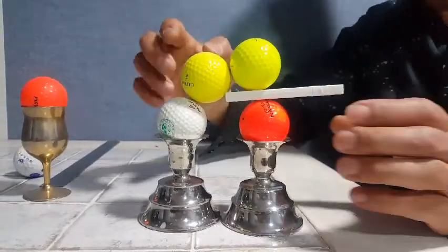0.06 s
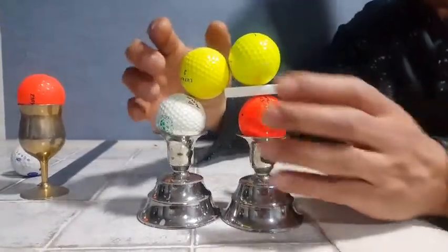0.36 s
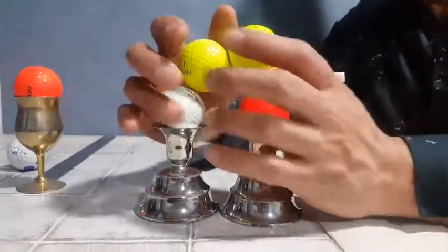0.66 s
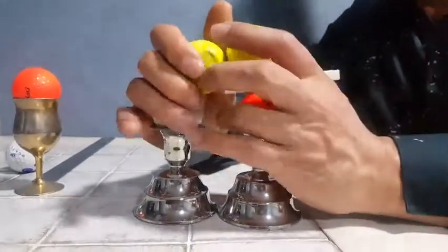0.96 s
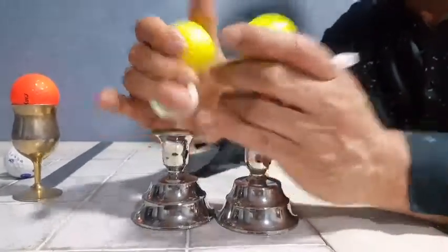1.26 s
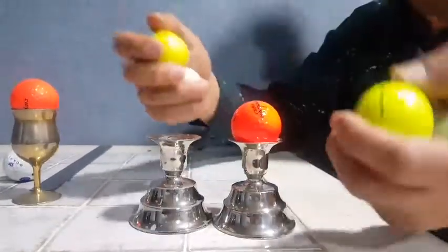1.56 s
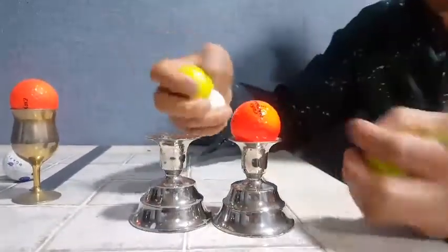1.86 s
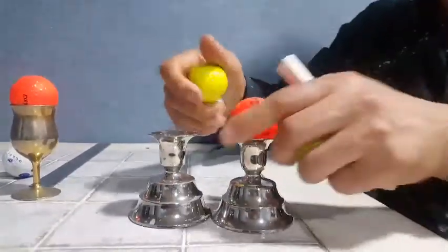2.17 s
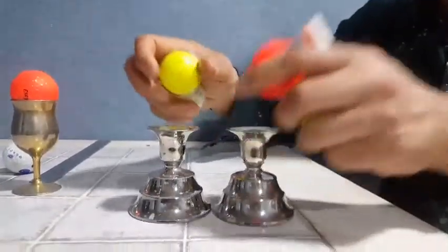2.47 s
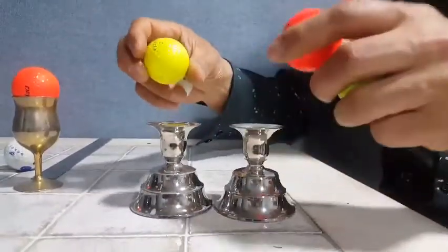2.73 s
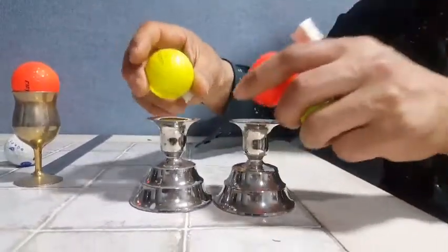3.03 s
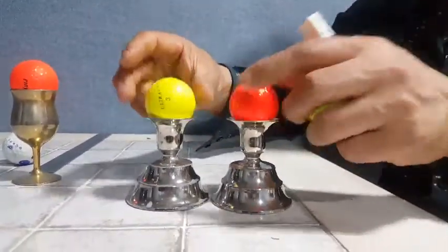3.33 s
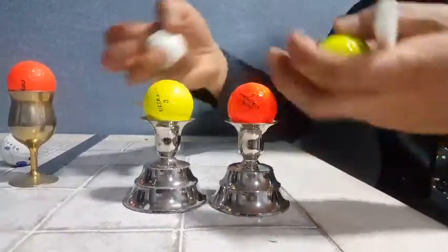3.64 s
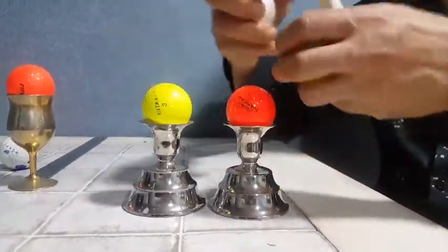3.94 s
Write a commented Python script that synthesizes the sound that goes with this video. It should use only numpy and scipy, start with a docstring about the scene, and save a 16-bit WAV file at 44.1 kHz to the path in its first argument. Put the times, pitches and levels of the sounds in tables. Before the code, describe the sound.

Two short, loud bursts of metal candle holders rocking and ringing on tiles, as golf balls are lifted off and put down. Faint taps and rubs come first and small ball clicks last, heard up close in a quiet room.

```python
"""A tiled table in a quiet room, close up: golf balls are handled over two metal candle holders.
One ball is lifted off and two are set down: each time a holder rocks, knocks and chatters on the tiles,
and its cup rings, higher while the ball presses on it. The steel sings briefly as a ball rubs the rim.
In between, balls click together, fingers tap and rub faintly, and sleeves brush."""
import sys
import numpy as np
from scipy import signal
from scipy.fft import rfft, irfft
from scipy.io import wavfile

SR = 44100
rng = np.random.default_rng(int(sys.argv[2]) if len(sys.argv) > 2 else 0)


def to_wav(sig):
    """Store sig (one row per channel, or 1-D mono) as 16-bit WAV at the path in sys.argv[1].

    Samples outside -1..1 are clipped; the rate is SR.
    """
    pcm = np.clip(np.atleast_2d(sig), -1, 1) * 32767
    pcm = np.round(pcm).astype(np.int16)
    wavfile.write(sys.argv[1], SR, pcm.T)  # frames by channels


N = 176400
T = np.arange(N) / SR
TAIL = SR // 2  # samples in a decay

# tone colour of a click on a golf ball: f/Hz, level/dB
CLICK_COLOUR = [(100, -13.5), (400, -12), (850, 6), (1700, 3.5), (2600, -2), (4200, -16.5), (6000, -23),
                (9000, -16.5), (15000, -26)]


def undb(db):
    """Decibels to gain."""
    return 10 ** (np.asarray(db) / 20)


def unit(x):
    """Scale to rms 1."""
    return x / np.sqrt(np.mean(x ** 2))


def pan(db):
    """Stereo gains with the left louder by db."""
    gains = undb(np.array([[db], [-db]]) / 2)
    return gains / gains.mean()


def filtered(x, kind, hz, order):
    """Butterworth low, high or band pass."""
    return signal.sosfilt(signal.butter(order, hz, kind, fs=SR, output="sos"), x)


def fade(t60):
    """Exponential decay of unit energy."""
    decay = np.exp(-np.log(1000) * T[:TAIL] / t60)
    return decay / np.linalg.norm(decay)


def swell(middle, length):
    """Bell-shaped envelope, timed in seconds."""
    return np.exp(-(2 * (T - middle) / length) ** 2)


def through(x, response):
    """Convolve with a response, channel by channel."""
    return signal.fftconvolve(np.atleast_2d(x), np.atleast_2d(response), axes=1)[:, :N]


def colour(points, size=4096):
    """Minimum-phase response of unit energy with the given spectrum."""
    hz, db = np.array(points).T
    bins = np.maximum(np.fft.rfftfreq(size, 1 / SR), 1)
    cepstrum = irfft(np.log(undb(np.interp(np.log(bins), np.log(hz), db))))
    cepstrum[1:size // 2] *= 2
    cepstrum[size // 2 + 1:] = 0
    response = irfft(np.exp(rfft(cepstrum)))
    return response / np.linalg.norm(response)


def stereo_noise(width, size):
    """Noise that spreads with width while its bass stays centred."""
    mid, side = rng.standard_normal((2, size))
    side = filtered(side, "high", 280, order=1)
    return np.array([mid + width * side, mid - width * side]) / np.hypot(1, width)


def scatter(t60, share, width):
    """A direct click followed by a dense fading tail without bass."""
    response = filtered(share * fade(t60) * stereo_noise(width, TAIL), "high", 300, order=2)
    response[:, 0] += 1
    return response / np.hypot(1, share)


def blows(times, db):
    """One impulse for each contact."""
    x = np.zeros(N)
    np.add.at(x, np.clip((np.asarray(times) * SR).astype(int), 0, N - 1), undb(db))
    return x


def ping(start, db, hz, t60):
    """One damped vibration."""
    age = np.maximum(T - start, 0)
    return undb(db) * np.exp(-np.log(1000) * age / t60) * np.sin(2 * np.pi * hz * age)


def room_tone():
    """A low steady bed of room noise with a faint wide hiss."""
    spectrum = [(12, -38.5), (20, -5.5), (22, -7.5), (34, -9.5), (53, -8.5), (207, -7), (245, -1),
                (282, -14.5), (306, -16), (333, -15.5), (404, -14.5), (565, -23), (985, -29.5), (1340, -29),
                (2030, -25.5), (3850, -34.5), (4950, -41), (7110, -42), (15500, -46)]  # colour of the bed: f/Hz, level/dB
    mid, side = rng.standard_normal((2, N))
    side = side - 0.45 * filtered(side, "low", 1500, order=1)  # narrower in the lows
    bed = through(np.array([mid + side, mid - side]), colour(spectrum))
    return unit(bed) * undb(-59) * pan(2.5)


def room_reverb(x):
    """A small room that holds on to the low notes."""
    tail = fade(t60=0.17) * stereo_noise(width=0.47, size=TAIL)
    tail = filtered(tail, "low", 200, order=1)
    tail = filtered(tail, "low", 1200, order=1)
    return undb(-5.5) * through(x.mean(axis=0), tail)


def brushes():
    """Soft swells of cloth and skin as the hands move."""
    strokes = [(1.15, 0.17, -67.5), (1.45, 0.31, -68.5), (1.8, 0.21, -67.5), (1.99, 0.078, -59),
               (3.52, 0.14, -68.5), (3.79, 0.056, -66.5)]  # hand movements: middle t/s, length/s, level/dB
    cloth = [(200, -9), (700, -1), (1500, -1.5), (2800, 3), (5000, -13.5), (8700, -9.5), (10500, -21),
             (15000, -16.5)]  # colour of sleeves and skin: f/Hz, level/dB
    envelope = sum(undb(db) * swell(t, length) for t, length, db in strokes)
    return through(envelope * stereo_noise(width=0.99, size=N), colour(cloth)) * pan(3)


def rubs():
    """A finger or ball rubs drily: short grainy swells, each in one broad resonance."""
    strokes = [(1.136, 0.028, -56.5, 2640, 1230), (1.044, 0.1, -63, 820, 470),
               (1.235, 0.04, -64, 2300, 440), (2.436, 0.026, -47.5, 1800, 600),
               (3.795, 0.027, -61, 2900, 670)]  # rubs: middle t/s, length/s, level/dB, centre f/Hz, bandwidth/Hz
    out = 0
    for t, length, db, hz, width in strokes:
        grain = rng.standard_normal(N) * np.exp(.5 * rng.standard_normal(N))
        band = filtered(grain, "band", [max(hz - width / 2, 50), hz + width / 2], order=2)
        out = out + undb(db) * unit(band) * swell(t, length)
    return out * pan(6)


def finger_taps():
    """A finger on a ball gives a dull tap that dies away in a rough little scuff."""
    # taps: t/s, tone level/dB, f/Hz, scuff t60/s, click level/dB, left minus right/dB
    taps = [(.959, -46, 410, .06, -66, 4), (1.012, -44.5, 644, 0.085, -55, 4),
            (1.039, -39.5, 800, 0.035, -63, 8), (1.0561, -40, 660, 0.11, -50, 5),
            (1.182, -43, 730, 0.14, -67, 7), (1.216, -39.5, 430, 0.043, -52.5, 6),
            (1.239, -43, 505, 0.071, -49, 5), (1.535, -36.5, 900, 0.1, -35, 2),
            (1.923, -40.5, 734, 0.034, -46, 2), (1.971, -48, 694, 0.016, -52, 4),
            (2.022, -46.5, 780, 0.024, -44, 3), (2.0793, -44, 1260, 0.015, -48.5, 5),
            (2.1337, -48.5, 950, 0.022, -48, 5), (2.323, -37.5, 440, 0.15, -58, 2.5),
            (2.352, -42, 480, 0.077, -58, 4), (2.877, -48, 680, 0.0091, -51.5, 27),
            (3.002, -44.5, 856, .012, -55, 27), (3.146, -48, 1898, 0.035, -59.5, 7),
            (3.541, -61, 813, 0.019, -38, -9), (3.8405, -47.5, 760, 0.011, -48, -5)]
    out, click = np.zeros((2, N + SR)), colour(CLICK_COLOUR)
    ring_cycles = 5.2
    for t, db, hz, t60, click_db, pan_db in taps:
        tone = ping(0, db + 5.5, hz, t60=ring_cycles / hz)[:len(click)]
        hit = tone + undb(click_db + 12.5) * click
        tap = pan(pan_db) * through(hit, scatter(t60, share=0.82, width=0.56))
        start = int(t * SR)
        out[:, start:start + tap.shape[1]] += tap
    return out[:, :N]


def ball_clicks():
    """Ball on ball: a snap and a few very short modes, smeared a little by the table."""
    clicks = [(1.5338, -40.5, 8), (1.537, -37, 9), (2.0787, -42.5, 4), (3.541, -29.5, 2.5),
              (3.796, -50, 8.5), (3.8413, -33, 2)]  # collisions: t/s, level/dB, left minus right/dB
    modes = [(830, -14.5, 0.019), (1370, -12, 0.0084), (2520, 4, 0.019), (2727, -2.5, 0.0091),
             (3350, -7, 0.0076), (4360, -18.5, 0.034)]  # modes of the click: f/Hz, level/dB, t60/s
    snap = undb(-7.5) * colour(CLICK_COLOUR)
    hit = snap + sum(ping(0, db, hz, t60) for hz, db, t60 in modes)[:len(snap)]
    impacts = sum(pan(pan_db) * blows([t], [db]) for t, db, pan_db in clicks)
    return undb(-3) * through(through(impacts, hit), scatter(t60=0.014, share=1.0, width=1.0))


def rim_squeaks():
    """The steel sings on one slightly unsteady mode as a ball rubs along the rim."""
    squeaks = [(2.524, 0.039, 1321, -24), (2.59, 0.077, 2200, -41.5), (3.383, 0.069, 2900, -43),
               (3.352, 0.033, 2300, -27)]  # sung notes: middle t/s, length/s, f/Hz, level/dB
    drift = np.cumsum(rng.standard_normal(N)) * 0.0071
    return sum(undb(db) * np.sqrt(2) * swell(t, length) * np.sin(2 * np.pi * hz * T + drift)
               for t, length, hz, db in squeaks)


def chatter(median_gap_s=0.001, spread_db=2.5):
    """Tiny uneven contacts in quick succession, rms 1."""
    gap, size = rng.standard_normal((8000, 2)).T
    times = np.cumsum(np.exp(gap / 2)) * median_gap_s
    inside = times < T[-1]
    return unit(blows(times[inside], spread_db * size[inside]))


def chatter_envelopes():
    """Gains of rattle, cup ring and treble over the three bouts of rocking."""
    # bouts of chatter: t/s, tile rattle level/dB, cup ring level/dB, treble level/dB
    lift = [(2.456, -68.5, -65, -69), (2.459, -30.5, -25.5, -46), (2.467, -30.5, -37, -32.5),
            (2.4695, -24.5, -12.5, -33), (2.488, -29, -22, -44.5), (2.534, -28.5, -22, -44),
            (2.543, -36.5, -35, -59), (2.562, -33, -32, -63.5), (2.566, -23, -28.5, -30.5),
            (2.581, -26, -19, -37.5), (2.598, -26, -36.5, -55), (2.606, -22.5, -23, -32),
            (2.629, -28, -28, -34), (2.638, -22, -18.5, -34.5), (2.649, -35.5, -54, -49.5),
            (2.662, -60, -52, -56)]
    touch = [(3.144, -56.5, -69, -69), (3.17, -46.5, -62, -71.5), (3.171, -31, -36.5, -51.5),
             (3.188, -26.5, -41, -64), (3.204, -47, -56.5, -72), (3.225, -66.5, -74, -77.5)]
    set_down = [(3.267, -56, -64, -58.5), (3.272, -23.5, -20, -45), (3.290, -32.5, -26.5, -37),
                (3.297, -24.5, -16.5, -38), (3.31, -27, -18, -50.5), (3.317, -29.5, -52.5, -51),
                (3.335, -22.5, -28.5, -42.5), (3.355, -18, -16.5, -33.5), (3.367, -23, -19.5, -30),
                (3.392, -20, -23.5, -38), (3.412, -22, -26, -36.5), (3.424, -27.5, -19, -44),
                (3.434, -33, -28, -44), (3.447, -30, -26, -49.5), (3.455, -40, -51, -53),
                (3.476, -64, -83.5, -68)]
    gains = np.zeros((3, N))
    for bout in (lift, touch, set_down):
        times, *levels = np.array(bout).T
        active = (T > times[0]) * (T < times[-1])
        gains += undb([np.interp(T, times, db) for db in levels]) * active
    return gains


def tiles(push, knocks):
    """The tiled top answers with a dark clatter and a short pitched thud for each knock."""
    spectrum = [(30, -31), (55, -22), (90, -5), (140, 2), (220, -2), (370, 0), (550, -3.5), (850, 1.5),
                (1200, -1), (1650, -8), (2200, -2), (3000, -22), (6000, -30.5), (10000, -52), (15000, -69)]  # colour of the table top: f/Hz, level/dB
    clatter = through(through(push, colour(spectrum)), scatter(t60=0.021, share=0.91, width=1))
    thuds = sum(ping(t, db, hz, t60=0.014) for t, db, hz, _, _ in knocks)
    return (clatter + filtered(thuds, "high", 110, order=2)) * pan(3.5)


def thin_steel(ticks, count=90):
    """Thin steel gives a short crash and many high partials, each with its own phase left and right."""
    spectrum = [(500, -35.5), (2000, -4.5), (2700, 0), (3200, -3.5), (3850, 7.5), (4650, -4.5), (5400, -9),
                (5850, -4), (6700, -10), (8000, -11.5), (8850, -5), (10200, -29), (11600, -11.5),
                (13300, -22.5), (14500, -29.5), (15800, -40.5)]  # colour of the steel: f/Hz, level/dB
    offset, left, right, size = rng.random((count, 4)).T
    hz = 2300 + (np.arange(count) + offset) * 13000 / count
    waves = np.sin(2 * np.pi * (hz[:, None] * T[:TAIL] + np.array([left, right])[:, :, None]))
    partials = unit((size[:, None] * waves).sum(axis=1)) * fade(t60=0.034)
    crash = scatter(t60=0.028, share=3.4, width=1)
    shimmer = undb(0.5)
    response = (crash + shimmer * partials) / np.hypot(1, shimmer)
    return through(through(ticks, colour(spectrum)), response) * pan(-0.5)


def holder_ring(push):
    """The holder's modes ring briefly, damped by the hand."""
    modes = [(362.5, -11, .18), (513, -12.5, 0.18), (684.3, -20, 0.058), (907, -16, 0.093),
             (1176, -21, .06), (1870, -11, 0.037), (2108, -12.5, 0.086), (2410, -21, .03),
             (2585, -12, 0.062), (3320, -31.5, .06), (3920, -30.5, 0.22), (4290, -29.5, 0.055),
             (4730, -31.5, .07), (4950, -32, 0.054), (5610, -29.5, .05), (7070, -34.5, 0.056),
             (8760, -23.5, 0.038)]  # holder modes: f/Hz, level/dB, t60/s
    response = sum((-1) ** k * undb(db) * fade(t60) * np.sqrt(2) * np.cos(2 * np.pi * hz * T[:TAIL])
                   for k, (hz, db, t60) in enumerate(modes))
    return undb(-4) * through(push, filtered(response, "low", 10500, order=4))


def cup_ring(contacts, envelope, clacks, jolt_rad=0.22):
    """Each contact feeds the cup's main ring and jolts its phase; the ball's pressure bends its pitch."""
    pitch = [(2.47, 1897), (2.59, 1903), (2.65, 1945), (3.18, 1916), (3.285, 1915), (3.312, 1985),
             (3.35, 2072), (3.39, 2160), (3.418, 1937), (3.45, 1900)]  # note of the cup under the ball: t/s, f/Hz
    drive = (contacts * envelope) ** 2 + (undb(9) * clacks) ** 2
    energy = through(drive, fade(t60=0.017) ** 2)[0]
    hz = np.interp(T, *np.array(pitch).T)
    jolts = jolt_rad * (contacts > 0) * rng.standard_normal(N)
    phase = np.cumsum(2 * np.pi * hz / SR + jolts)
    tone = np.sqrt(2 * np.abs(energy)) * np.sin(phase)
    return filtered(tone, "band", [900, 4000], order=2) * undb(-1.5) * pan(9)


def rocking_holders():
    """Knocks and chatter shake the tiles, the thin steel, the holders' modes and their cups."""
    # knocks of a rocking holder: t/s, thud level/dB, thud f/Hz, clack level/dB, tick level/dB
    knocks = [(2.449, -36, 700, -28.5, -41), (2.4575, -22.5, 1100, -18.5, -21.5),
              (2.4685, -28.5, 1500, -6.5, -15.5), (2.4957, -11.5, 1300, -20, -21),
              (2.5145, -20.5, 1320, -24, -29.5), (2.5225, -15, 1320, -34, -36.5),
              (2.5287, -16, 1300, -15, -35), (2.5345, -21.5, 1320, -23.5, -44),
              (2.5640, -39, 1200, -13, -13), (2.5685, -21, 1400, -30, -13), (2.5787, -14, 1150, -23, -22.5),
              (2.5922, -14, 950, -31.5, -29), (2.6010, -38, 800, -11.5, -10), (2.6060, -36, 1200, -10, -24),
              (2.6162, -9.5, 950, -24, -29), (2.6230, -39, 800, -24.5, -24.5),
              (2.6355, -38, 900, -30.5, -22.5), (3.1713, -22, 450, -30, -38.5),
              (3.1778, -23, 700, -25, -38), (3.1850, -20.5, 500, -43, -36),
              (3.1925, -24, 600, -32.5, -54.5), (3.2707, -31.5, 700, -25.5, -28.5),
              (3.2730, -18, 750, -12.5, -22.5), (3.2805, -21.5, 750, -13, -33),
              (3.2970, -17.5, 1200, -19.5, -21), (3.3220, -24, 700, -28, -25.5),
              (3.3280, -24.5, 700, -20, -27.5), (3.3330, -25, 600, -26, -17),
              (3.3402, -5.5, 800, -31.5, -29), (3.3460, -11.5, 850, -19, -25.5),
              (3.3610, -8, 850, -22, -14.5), (3.4190, -12.5, 700, -41, -22),
              (3.4415, -22.5, 650, -31, -18.5)]
    times, _, _, clack_db, tick_db = np.array(knocks).T
    contacts, clacks = chatter(), blows(times, clack_db)
    rattle_gain, cup_gain, treble_gain = chatter_envelopes()
    rocking = contacts * rng.choice([-1, 1], N)
    push = undb(10) * clacks + undb(-2) * rocking * rattle_gain
    ticks = undb(10.5) * blows(times, tick_db) + undb(-1.5) * rocking * treble_gain
    clatter = tiles(push, knocks) + thin_steel(ticks)
    ring = (holder_ring(push) + rim_squeaks()) * pan(10)
    return clatter + ring + cup_ring(contacts, cup_gain, clacks)


def scene():
    """Holders, balls and hands up front, with the room behind them."""
    near = rocking_holders() + ball_clicks() + finger_taps() + rubs() + brushes()
    return near + room_reverb(near) + room_tone()


def record(dry, low_hz=32.92, top_hz=15750):
    """A phone microphone cuts the deepest rumble and the top of the treble."""
    dry = filtered(dry, "high", low_hz, order=4)
    return signal.sosfilt(signal.ellip(10, .2, 80, top_hz, fs=SR, output="sos"), dry)


dry = scene()
out = record(dry)
to_wav(out)
```